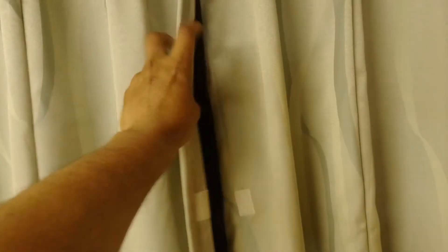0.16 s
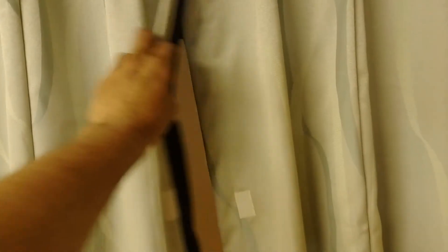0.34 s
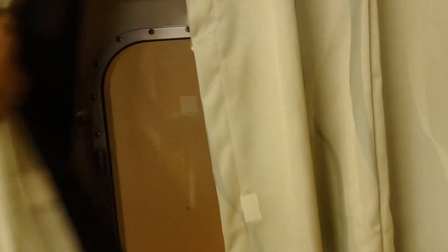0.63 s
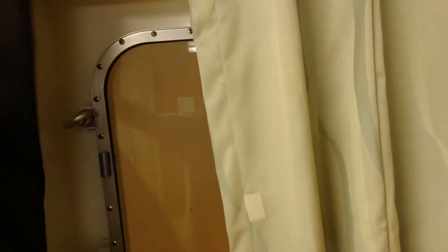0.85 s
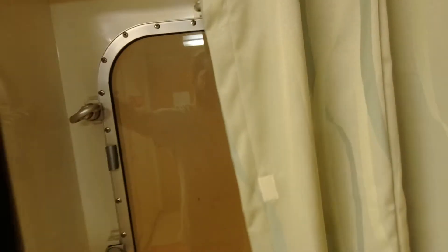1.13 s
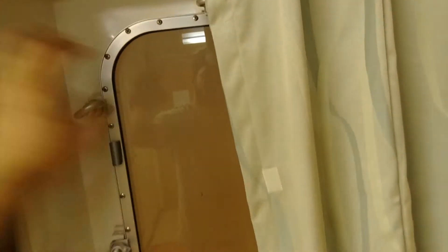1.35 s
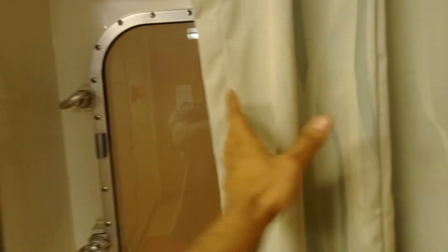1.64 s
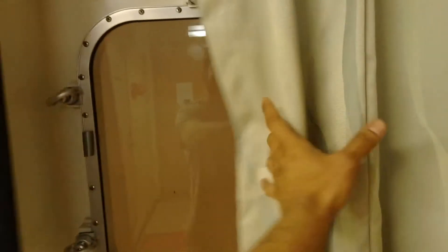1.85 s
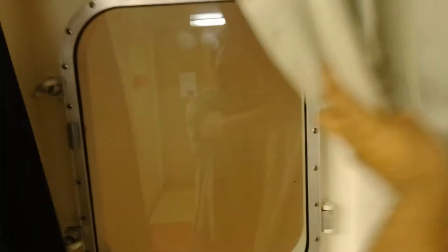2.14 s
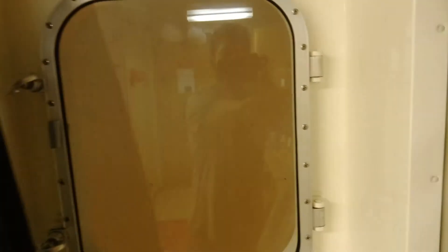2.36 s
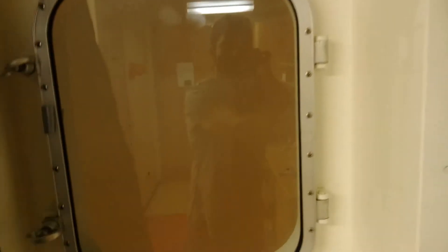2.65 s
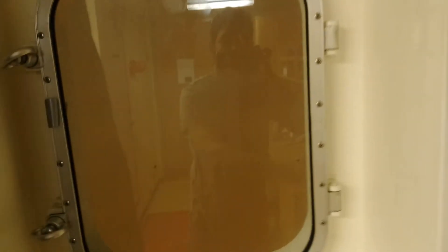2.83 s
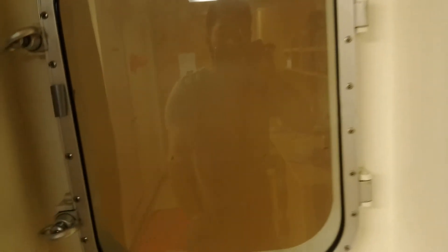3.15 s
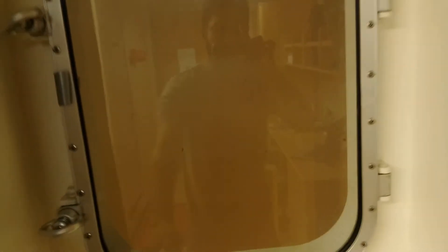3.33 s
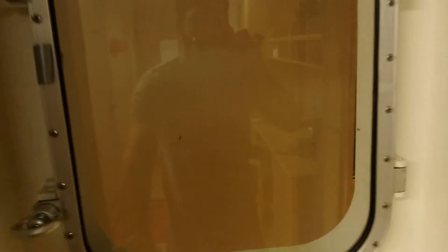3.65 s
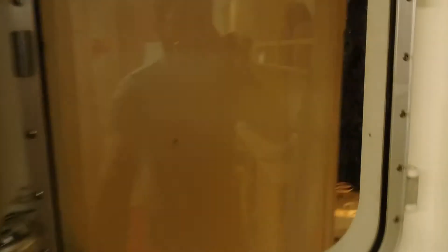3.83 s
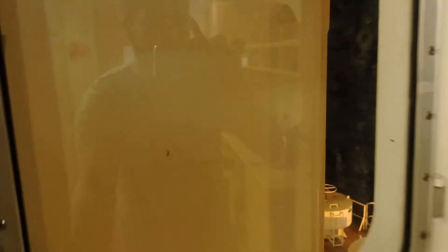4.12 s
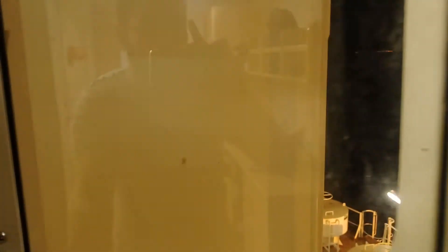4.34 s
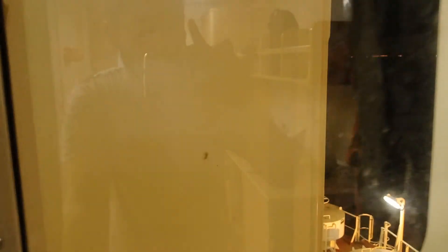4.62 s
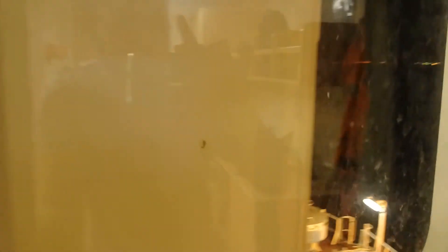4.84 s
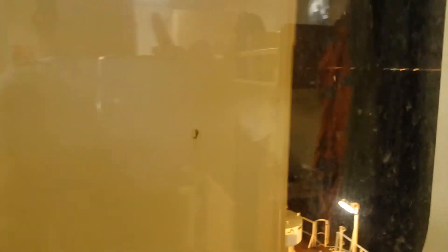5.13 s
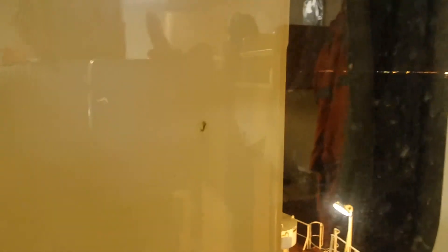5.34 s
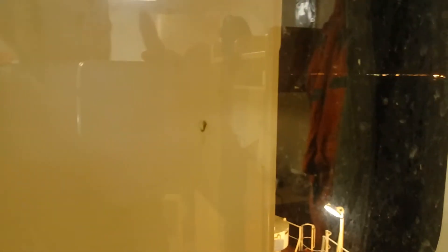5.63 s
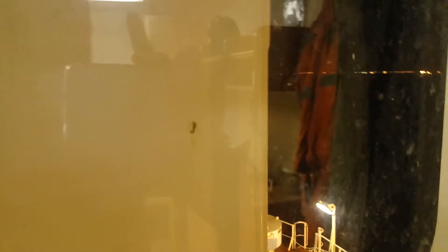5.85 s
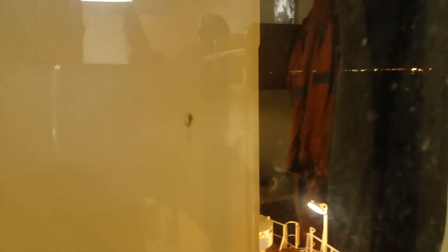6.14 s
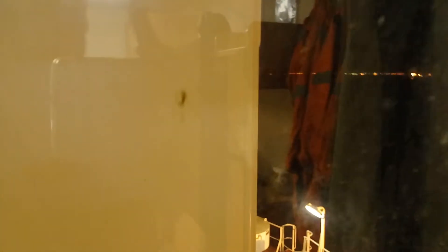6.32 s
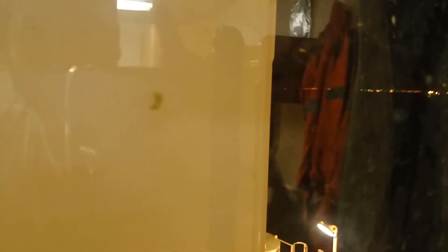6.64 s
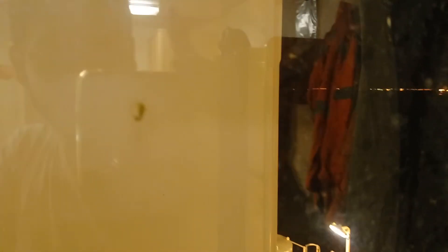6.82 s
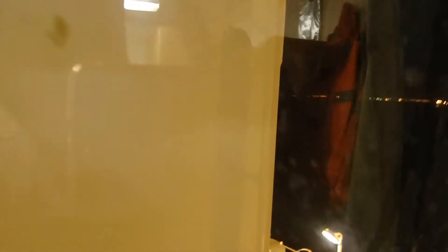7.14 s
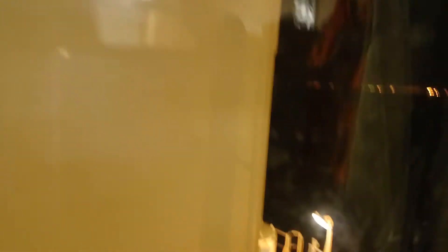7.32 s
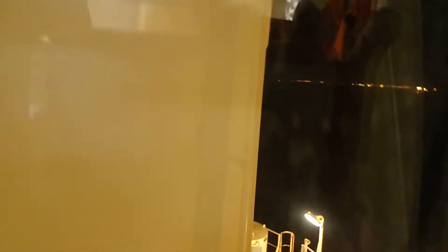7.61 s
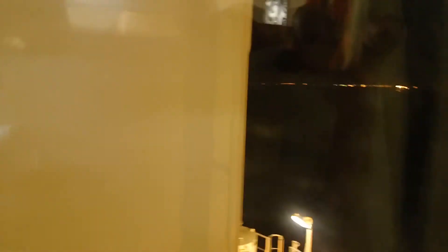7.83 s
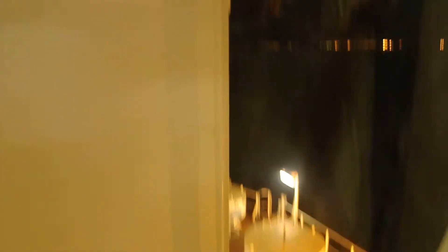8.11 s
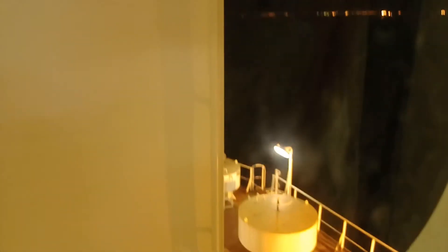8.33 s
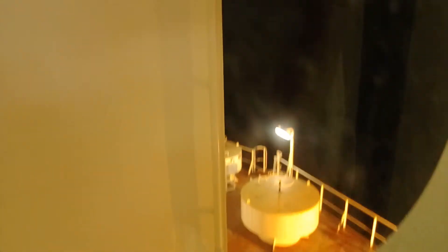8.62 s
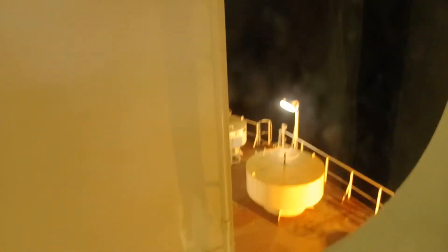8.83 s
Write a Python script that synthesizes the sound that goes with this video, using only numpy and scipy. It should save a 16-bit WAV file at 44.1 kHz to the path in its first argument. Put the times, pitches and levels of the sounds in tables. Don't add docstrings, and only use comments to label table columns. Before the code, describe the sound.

Inside a small ship cabin, engines drone low behind the walls. A curtain is swept aside with a short swish and snap, then a second, brighter and more rattly. A hard click with a dull thud follows. The hum and a duct whistle swell as the handheld microphone nears the porthole, with clothing rustles, a brief sole scuff and dry crackles close by.

```python
import sys
import numpy as np
from scipy import signal
from scipy.fft import rfft, irfft
from scipy.io import wavfile
from scipy.ndimage import uniform_filter1d

SR = 44100
rng = np.random.default_rng(int(sys.argv[2]) if len(sys.argv) > 2 else 0)


def decibels_to_gain(level_db):
    exponent = np.asarray(level_db, float) / 20
    return 10 ** exponent


def inscribe(sig):
    pcm = np.round(np.clip(np.atleast_2d(sig).T, -1, 1) * 32767)
    wavfile.write(sys.argv[1], SR, pcm.astype(np.int16))


N = 395577

# t/s, gain/dB
APPROACH = [(0, -2), (.5, 0.6827), (2.6, 0.5), (3.6, 0), (4.35, 4.5), (4.75, 3.5), (5.5, 5.5), (6.7, 7),
            (7.5, 9), (8.97, 9.5)]


def evened(x):
    return x / np.sqrt(np.mean(x ** 2) + 1e-20)


def read(points, hz):
    f, value = np.transpose(points)
    return np.interp(np.log(hz + 1), np.log(f + 1), value)


def placed(sounds):
    mix = np.zeros((2, N))
    for s, sound in sounds:
        part = mix[:, round(s * SR):][:, :sound.shape[1]]
        part += sound[:, :part.shape[1]]
    return mix


def sides(pan_db):
    return decibels_to_gain(np.array([pan_db / 2, -pan_db / 2]))


def per_band(shape_db, hz, lo, hi):
    return -10 * np.log10(np.sum(decibels_to_gain(2 * shape_db) * (hz > lo) * (hz < hi)) / len(hz))


def patches(shape, size):
    field = rng.standard_normal(shape[::-1]).T
    return evened(uniform_filter1d(uniform_filter1d(field, size[0], 0), size[1], 1))


def partner(a, b, same):
    return same * a + np.sqrt(1 - same ** 2) * b


def arch(t, middle_s, length_s):
    return np.maximum(1 - (2 * (t - middle_s) / length_s) ** 2, 0)


def resonance(hz, centre_hz, width_hz):
    return 1 / (1 + (2 * (hz - centre_hz) / width_hz) ** 2)


def swells(t, rows, rest_db):
    power = decibels_to_gain(2 * rest_db) + 0 * t
    for middle_s, length_s, db in rows:
        power = power + decibels_to_gain(2 * db) * arch(t, middle_s, length_s) ** 2
    return 10 * np.log10(power)


def fan_tones_db(hz, t):
    # f/Hz, width/Hz, middle t/s, length/s, level above drone/dB
    tones = [(1740.2, 45.36, 4.8022, 1.243, 10), (2208.5, 54, 5.2226, .7, 9.5), (3108, 50, 4.5, 1.2, 11.5),
             (2084.2, 41.15, 6.769, 2.148, 8), (1568.9, 36, 6.04, 2.5, 8.5),
             (1695.1, 35.75, 6.744, 2.164, 8.5), (1765, 51, 7.447, 1.3, 5.5),
             (2017.1, 60, 7.8416, 1.019, 9), (1104.6, 43.97, 7.0287, 2.958, 9.5),
             (3444.3, 90, 7.5, 0.87, 7.5), (3387.5, 110, 7.9186, .5, 8), (3469.3, 90, 8.15, 0.63, 8),
             (2955.8, 350, 8, 1.5, -4.5), (1232, 397, 1.559, 0.117, -7.5),
             (1225.3, 247.7, 0.0905, 0.4002, -9), (3256, 60.7, 6.96, 0.743, 4), (2593.8, 50, 8.3, 1.8, 6.5),
             (962.3, 56, 8.5, 0.87, 5), (1419, 651, 1.7781, 0.4925, 6)]
    flutter = patches((2 * len(tones), len(t)), size=(1, 5)).reshape(len(tones), 2, -1)
    total_db = 0
    for (f, width_hz, middle_s, length_s, db), (on, waver) in zip(tones, flutter):
        strength = np.clip(1 + 0.24 * on, 0, 1.5) * arch(t, middle_s, length_s)
        total_db = total_db + db * strength * resonance(hz[:, None], f * (1 + 0.0063 * waver), width_hz)
    return total_db


def panels_db(hz, t):
    # f/Hz, width/Hz, level above drone far from pane/dB, near it/dB
    panels = [(30.98, 7.5, -5.5, -6.5), (59.91, 10.399, 16, 3.5), (91.79, 6.8, 4, -0.5),
              (125.78, 10, -12.5, 7.5), (145.51, 6.8, -12, -6.5), (164.91, 24.67, 6.5, 10.5),
              (199.3, 9.4, 0.5, 9), (226.84, 50.09, 9, 0), (296.44, 14.315, 0.5, 14),
              (332.2, 90.12, 6.5, -11), (450.57, 9.8, 3, 8.5), (524.36, 18.007, 2.5, 7.5),
              (592.85, 96, -4, 4), (1083.5, 30, 3.5, 4), (1220.9, 21, 1, 9), (1744.3, 23, 7.5, 8),
              (2070.8, 120, 3.5, 4.5), (2426.9, 120, 6, 1), (3140, 29, 3.5, -3.5), (3469.7, 56, 5.5, 8)]
    # t/s, nearness to pane/0-1
    nearness = [(0, 0.02), (3.4, 0.18), (4.6, 0.48), (6.8, 0.99), (7.6, 0.92), (8.97, 0.78)]
    near = np.interp(t, *np.transpose(nearness))
    sway = 1 + .011 * patches((len(panels), len(t)), size=(1, 25))
    total_db = 0
    for (f, width_hz, far_db, near_db), k in zip(panels, sway):
        level_db = far_db + (near_db - far_db) * near
        total_db = total_db + level_db * resonance(hz[:, None], f * k, width_hz)
    return total_db


def machinery():
    # f/Hz, density/dB
    drone = [(12, -51), (20, -10), (107, 1.5), (163, -1.5), (187, -7), (248, -19), (337, -23.5), (446, -25),
             (624, -27.5), (718, -27.5), (923, -31.5), (1760, -32), (4420, -54.5), (10500, -57),
             (16000, -59.5)]
    registers = [
        (-45, 0.9242),
        (-50.5, 1.1045),
        (-55.5, 0.81272),
    ]
    # f/Hz, width/Hz
    duct = (743.65, 75.63)
    # middle t/s, length/s, top level/dB
    whistles = [
        (0.68, 0.96, -47.5),
        (3.4, 1.834, -45),
        (5.7, 2.5, -42),
        (8.49, 1.2443, -30.5),
    ]
    # f/Hz, left-right likeness
    likeness = [(60, 0.9864), (200, 0.9695), (300, 0.8107), (700, 0.8448), (1200, 0.5943), (2500, 0.4142),
                (5000, 0.14), (15000, 0.11)]
    hz, t, (a, b) = signal.stft(rng.standard_normal((N, 2)).T, SR, nperseg=4096, noverlap=3072)
    shape = read(drone, hz)
    approach_db = np.interp(t, *np.transpose(APPROACH))
    hull, wall, fan = (db + share * approach_db for db, share in registers)
    hiss = -52.5 + 0 * t
    lift = np.array([hull + per_band(shape, hz, 40, 140), wall + per_band(shape, hz, 250, 680),
                     fan + per_band(shape, hz, 894.4, 3400), hiss + per_band(shape, hz, 900, 3000) - 1.5])
    register = np.interp(np.log(hz + 1), np.log([150, 400, 1100, 3000, 4500]), [0, 1, 2, 2, 3])
    weights = np.maximum(1 - abs(register[:, None] - np.arange(4)), 0)
    gain_db = shape[:, None] + panels_db(hz, t) + weights @ lift + 1.5 * patches(a.shape, size=(5, 8))
    gain = decibels_to_gain(gain_db + fan_tones_db(hz, t))
    whistle = evened(resonance(hz, *duct))
    gain = np.hypot(gain, whistle[:, None] * decibels_to_gain(swells(t, whistles, rest_db=-56.5) - 12.0))
    z = np.array([a, partner(a, b, read(likeness, hz)[:, None])]) * gain
    return decibels_to_gain(0.5) * signal.istft(z, SR, nperseg=4096, noverlap=3072)[1][:, :N]


def hum():
    drive = [(0.25, 0.3939, -40), (0.84, 0.3424, -38.5), (1.38, 0.3249, -33), (1.652, 0.2475, -35),
             (2.345, 0.2243, -37), (2.1, 0.297, -44.5), (2.753, 0.273, -44.5), (3.071, 0.1329, -37),
             (3.45, 0.6018, -44), (4.031, 0.5433, -32.5), (4.196, 0.043, -26), (4.37, 0.09024, -32),
             (4.573, 0.3566, -31.5), (4.849, 0.13954, -29), (5.008, 0.1349, -31), (5.144, 0.10547, -31),
             (5.376, 0.20207, -23.5), (5.538, 0.1382, -29), (5.675, 0.157, -30), (5.833, 0.1509, -23),
             (6.171, 0.5165, -26.5), (6.421, 0.1817, -26.5), (6.619, 0.1096, -36.5), (6.912, 0.43, -26.5),
             (7.149, 0.1154, -27), (7.244, 0.139, -29.5), (7.448, 0.31995, -25.5), (7.784, 0.4235, -24.5),
             (8.125, 0.4818, -24.5), (8.391, 0.2004, -27), (8.579, 0.1641, -28.5), (8.761, 0.19905, -22),
             (8.96, 0.071, -25)]
    centre_hz, wander_hz, rest_db = 160.45, 2.1447, -52.5
    t = np.arange(N) / SR
    drift = evened(uniform_filter1d(uniform_filter1d(rng.standard_normal(N), size=5000), size=5000))
    phase = 2 * np.pi * np.cumsum(centre_hz + wander_hz * drift) / SR
    level_db = swells(t, drive, rest_db + np.interp(t, *np.transpose(APPROACH)))
    return np.sqrt(2) * decibels_to_gain(level_db) * np.sin(phase) * np.ones((2, 1))


def knock(s, db, hz, t60_s):
    t = np.arange(SR // 2) / SR
    noise = rng.standard_normal((2, len(t)))
    band = signal.butter(2, [hz * 0.6573, hz * 1.3226], "band", fs=SR)
    body = signal.lfilter(*band, noise + 0.383 * noise[::-1])
    return s, evened(body) * decibels_to_gain(db - 60 * t / t60_s) * np.minimum(t / 0.006837, 1)


def knocks():
    # t/s, peak/dB, centre f/Hz, t60/s
    rows = [
        (2.38, -36, 349, 0.429),
        (4.189, -33.5, 442.1, 0.5847),
        (4.2, -36, 674.5, 0.4773),
        (4.19, -37.5, 1082.5, 0.2636),
        (4.269, -26, 107.94, 0.2178),
        (4.281, -36, 322, 0.4652),
        (7.33, -34, 355.2, 0.2426),
        (4.2, -34, 233.4, 0.3297),
        (7.335, -33, 196.4, .15),
    ]
    return placed(knock(*row) for row in rows)


def rub(rows, colour, centre_hz, split_hz, slips_per_s, grain_db, same, pan_db, patchy_db, flutter_db=0):
    s, bright_db, dull_db, peak_hz = np.transpose(rows)
    n = round((s[-1] - s[0]) * SR)
    draw = rng.random((n, 2))
    slips = decibels_to_gain(-grain_db * np.log(draw[:, 0] + 0.024)) * (draw[:, 1] < slips_per_s / SR)
    decay_s = 0.00031
    grit = evened(1 + signal.lfilter([1], [1, -np.exp(-1 / (decay_s * SR))], slips))
    a, b = rng.standard_normal((n, 2)).T
    grains = grit * np.array([a, partner(a, b, same)])
    hz, t, z = signal.stft(grains, SR, nperseg=256, noverlap=192)
    t = t + s[0]
    shape = read(colour, hz)
    high = np.clip((hz / split_hz - .8) / 0.905, 0, 1)[:, None]
    slid_hz = hz[:, None] * centre_hz / np.interp(t, s, peak_hz)
    upper = read(colour, slid_hz) + per_band(shape, hz, split_hz, SR)
    lower = shape[:, None] + per_band(shape, hz, 0, split_hz) + np.interp(t, s, dull_db)
    gain_db = high * upper + (1 - high) * lower + np.interp(t, s, bright_db)
    gain_db = gain_db + patchy_db * patches(z[0].shape, size=(8, 40))
    gain_db = gain_db + flutter_db * patches(z[0].shape, size=(40, 6))
    out = signal.istft(z * decibels_to_gain(gain_db), SR, nperseg=256, noverlap=192)[1] * sides(np.array([pan_db]))
    return s[0], out * signal.windows.tukey(out.shape[1], 0.009215 / (s[-1] - s[0]))


def clothes():
    moves = [(.03, -65.5, -0.01, -11.5), (.1, -59.5, 0.1486, -12.5), (.43, -59.5, 0.2867, -8.5),
             (.53, -56, 0.2144, -7), (1.2, -57, 0.1157, -6), (1.38, -54.5, 0.1862, -9.5),
             (1.46, -56, 0.2112, -4), (1.66, -59, 0.2993, -14.5), (1.9, -63, 0.0683, 0),
             (2.13, -54, 0.2486, -9.5), (2.72, -48.5, 0.2709, -6), (2.95, -63.5, 0.5232, -15.5),
             (3.18, -57.5, -0.02, -2), (3.33, -58, 0.1068, -3), (3.57, -55, 0.1318, -9.5),
             (3.8, -66, 0.1308, -2), (3.96, -63, 0.1206, -17.5), (4.17, -52.5, 0.0146, -4),
             (4.28, -63, 0.5, -13), (4.46, -68.5, 0.0844, -7), (4.6, -64, 0.2583, -15.5),
             (4.8, -71, 0.3516, -10.5), (5.0, -68.5, 0.1137, -4.5), (5.14, -66, 0.1139, -3),
             (5.28, -59, 0.0227, 0), (5.77, -73, 0.0751, -10.5), (5.915, -49.5, 0.0276, -11),
             (5.94, -48.5, 0.023, -5.5), (5.97, -53.5, 0.03, -8), (6.15, -65.5, 0.5, -13),
             (6.37, -56, 0.0736, -9.5), (6.57, -60, 0.1014, -4), (6.66, -54, 0.1073, -7),
             (6.905, -64, 1.0426, -19), (7.0, -60.5, 0.393, -22.5), (7.1, -58, 0.1514, -6.5),
             (7.2, -51.5, 0.1487, 0.5), (7.28, -50, 0.1128, -14.5), (7.36, -43, 0.007, -8),
             (7.4, -43.5, 0.0264, -19), (7.53, -50, 0.0565, -14), (7.65, -49, 0.0622, -13.5),
             (7.76, -52, 0.1055, -16), (7.88, -50.5, 0.0488, -12.5), (7.97, -59.5, 0.1758, -16.5),
             (8.04, -66, 0.2327, -18.5)]
    # f/Hz, density/dB
    rustle = [(1500, -24.5), (2500, -7.5), (3300, -6.5), (4600, -12.5), (6000, -12.5), (7500, -13),
              (8700, -8), (10000, -6), (11000, -3), (12200, -13.5), (16000, -22.5)]
    rise_share = 0.7868
    s = np.arange(0, N / SR, .005)
    top_s, db, fall_s, dull_db = np.transpose(moves)[:, :, None]
    drop = np.maximum((s - top_s) / fall_s, (top_s - s) / (rise_share * fall_s))
    power = decibels_to_gain(2 * (db - 10 * drop)) + 1e-30
    bright = power.sum(0)
    dull = (power * decibels_to_gain(2 * dull_db)).sum(0) / bright
    rows = np.transpose([s, 10 * np.log10(bright), 10 * np.log10(dull), 10300 + 0 * s])
    return placed([rub(rows, rustle, centre_hz=10500, split_hz=6000, slips_per_s=400, grain_db=1.0,
                       same=.3, pan_db=-.3, patchy_db=1.7)])


def scuff():
    # hold/s, bright level/dB, dull re bright/dB
    hold_s, db, dull_db = (0.06659, -48, 5.413)
    # f/Hz, density/dB
    sole = [(820, -46), (1400, -21.5), (1610, 2), (1790, -1), (1960, -4.5), (2280, -15), (3070, -10),
            (3360, -14), (4380, -11.5), (4570, -21.5), (5890, -19.5), (6520, -22), (9320, -25.5),
            (11900, -19.5), (16000, -40.5)]
    start_s, set_in_db_per_s, let_go_db_per_s = 6.655, 3000, 260
    s = np.arange(-.04, .18, .005)
    drop_db = np.maximum(-set_in_db_per_s * s, let_go_db_per_s * (s - hold_s))
    level_db = db - np.maximum(drop_db, 0)
    rows = np.transpose([start_s + s, level_db, dull_db + 0 * s, 10500 + 0 * s])
    return placed([rub(rows, sole, centre_hz=10500, split_hz=4300, slips_per_s=300, grain_db=1.5,
                       same=.4, pan_db=.3, patchy_db=1.5)])


def crackle(s, db, hz, ms):
    t = np.arange(2400) / (SR * ms / 1000)
    burst = rng.standard_normal((2, 2400)) * np.exp(-t) * (1 - np.exp(-t / 0.27)) ** 2
    spread = .13
    band = signal.butter(3, [hz * (1 - spread), hz * (1 + spread)], "band", fs=SR)
    ring = signal.lfilter(*band, burst + 0.13 * burst[::-1])
    return s, decibels_to_gain(db + 1.5) * ring / abs(ring).max()


def crackles():
    # t/s, peak/dB, ring f/Hz, length/ms
    rows = [(0.2558, -46, 10810, 8.73), (.2566, -47, 8210, 11.67), (4.4263, -46, 11220, 5.453),
            (4.9691, -49, 11020, 8.93), (5.111, -47.5, 11230, 8.08), (5.231, -48.5, 11350, 10),
            (5.372, -54.5, 11000, 8), (5.633, -46, 11400, 9.14), (6.8372, -52.5, 10790, 6.05),
            (6.8969, -45, 11330, 11.72), (6.958, -50, 11210, 12.03), (6.985, -41.5, 11510, 11.95),
            (6.998, -40.5, 10760, 9.7), (7.315, -27.5, 11020, 2.393), (7.382, -21.5, 10380, 2.9),
            (7.401, -31.5, 10810, 3.87), (7.4589, -40, 10960, 3.043), (7.5162, -47.5, 10190, 12.09),
            (7.546, -43.5, 11410, 5.97), (7.5885, -47.5, 11600, 3.287), (7.6223, -39, 11000, 3.96),
            (7.645, -43.5, 10800, 8.08), (7.6733, -43.5, 10600, 5.045), (7.7281, -34.5, 11430, 3.43),
            (7.7686, -44.5, 11000, 5.02), (7.787, -42.5, 11600, 4.39), (7.842, -45.5, 11500, 13.75),
            (7.895, -47, 12000, 5.9)]
    return placed(crackle(*row) for row in rows)


def squeak(s, seconds, start_hz, end_hz, db, shake_hz):
    n = round(seconds * SR)
    shake = evened(uniform_filter1d(rng.standard_normal((n, 2)), size=90, axis=0)).T
    phase = 2 * np.pi * np.cumsum(np.linspace(start_hz, end_hz, n) + shake_hz * shake[0]) / SR
    return s, decibels_to_gain(db + 2.69 * shake[1]) * np.sin(phase) * signal.windows.tukey(n, .5) * np.ones((2, 1))


def squeaks():
    # t/s, length/s, start f/Hz, end f/Hz, level/dB, unsteadiness/Hz
    rows = [
        (1.639, 0.0403, 8770, 8346, -53.5, 70),
        (1.63, 0.07507, 10300, 10230, -51, 250.2),
        (1.735, 0.038, 9700, 10190, -55.5, 70),
        (1.762, 0.02973, 10120, 9549, -54.5, 70),
        (2.9, 0.38, 8920, 8597, -59, 260),
        (4.113, 0.0748, 11300, 12690, -59.5, 90),
        (6.688, 0.04842, 3200, 3000, -46, 90.04),
    ]
    return placed(squeak(*row) for row in rows)


def click():
    # f/Hz, density/dB
    colour = [(300, -34.5), (900, -10.5), (2250, -3.5), (3600, -32), (4700, -14), (6800, -12), (10300, -6),
              (13300, -13), (16000, -26.5)]
    start_s, db = 4.1896, -23
    t = np.arange(SR // 4) / SR
    bounce = 0.1135 * np.exp(-abs(t - .011) / 0.000997)
    rattle = np.exp(-t / 0.005383) + bounce + 0.1843 * np.exp(-t / 0.04757)
    noise = rng.standard_normal((2, len(t)))
    hz = np.fft.rfftfreq(len(t), 1 / SR)
    spectrum = rfft(noise + 5.965 * noise[::-1]) * decibels_to_gain(read(colour, hz))
    return start_s, decibels_to_gain(db) * evened(irfft(spectrum, len(t))) * rattle


def tick(s, db, hz, knock_db, ms):
    t = np.arange(1200) / (SR * ms / 1000)
    burst = rng.standard_normal((2, 1200)) * np.exp(-t) * np.minimum(t / 0.054, 1)
    burst = burst + 0.095 * burst[::-1]
    ring = signal.lfilter(*signal.butter(2, [hz * .85, hz * 1.16], "band", fs=SR), burst)
    top = signal.lfilter(*signal.butter(2, 9000, "high", fs=SR), burst)
    dull = signal.lfilter(*signal.butter(2, [1700, 4800], "band", fs=SR), burst)
    bright = evened(ring) + 0.2792 * evened(top)
    return s, decibels_to_gain(db + 3) * (bright / abs(bright).max() + decibels_to_gain(knock_db) * dull / abs(dull).max())


def hard_hits():
    # t/s, peak/dB, ring f/Hz, low knock re ring/dB, length/ms
    ticks = [(0.255, -49, 6000, -1.5, 4.76), (0.833, -25, 7800, -3, 1.442),
             (0.8417, -19, 6850, -3.5, 2.483), (2.116, -34.5, 9600, -3, 2.488),
             (2.2251, -29, 6560, 3, 2.718), (2.2871, -26, 6700, -3, 2.277),
             (2.352, -31.5, 7160, -11.5, 1.64), (2.515, -20.5, 9760, -6, 1.3),
             (2.5277, -13, 7130, -7.5, 2.706), (2.6953, -24, 6750, -2, 3.234),
             (2.7042, -28.5, 7600, -0.5, 2.962), (2.3155, -38, 7470, -19, 3),
             (2.3449, -31.5, 7490, -1, 3.09), (2.4493, -29.5, 7390, -14.5, 4.05),
             (2.523, -23.5, 7170, -10, 1.177), (2.553, -26.5, 11000, -15.5, 2.7),
             (2.6955, -29.5, 10500, -9.5, 1.507)]
    rattles = [
        (0.891, -28, 6934, 3, 4.13),
        (2.1993, -39, 7304, 4.5, 4.434),
        (2.294, -31.5, 7393, 4, 4.69),
        (2.371, -25.5, 7524, -18.5, 6.73),
        (2.4004, -16, 6884, -5, 4),
        (2.405, -18, 8500, 0, 3.604),
        (2.4739, -20, 7900, -7, 3.5),
        (2.489, -22, 8104, 1.5, 2.1),
        (2.5345, -17.5, 8110, -14, 1.9),
    ]
    snaps = [
        (1.0889, -19, 7200, -3, 1.2),
        (2.5365, -12.5, 14500, -30, 2.5),
        (2.5372, -12, 7500, -8, 2),
        (2.5155, -24, 13000, -30, 2),
        (4.1925, -19, 11000, -6, 3),
        (4.1995, -23, 9500, -2, 3),
        (4.1897, -16, 12000, -8, 1.8),
    ]
    flicks = [
        (4.4269, -52.5, 8000, 4, 7.91),
        (4.9695, -54.5, 7500, 4.5, 8),
        (5.111, -52, 7495, 3, 7.88),
        (5.231, -52, 8000, 1.5, 9.5),
        (5.633, -51.5, 6998, 4, 8.85),
        (6.51, -48, 7500, 0, 3.553),
        (6.658, -46, 6000, 9.5, 5.2),
        (.701, -37.5, 8250, -4, 2.945),
    ]
    return placed([tick(*row) for row in ticks + rattles + snaps + flicks] + [click()])


def curtains():
    # t/s, swish level by hand speed/dB, rail scrape re swish/dB, fabric pitch/Hz
    pulls = [
        [(.555, -57.5, -12.5, 9000), (.585, -46, -2, 8606), (.69, -45, -0.5, 9024), (.71, -41, 0, 8909),
         (.8, -41, -2.5, 9013), (.845, -42.5, 0.5, 9140), (.862, -42.5, 2.5, 9000)],
        [(.858, -48, -2.5, 9000), (.872, -37, -1.5, 8965), (.93, -38.5, -7.5, 8983), (.97, -35.5, -6, 8859),
         (1.03, -37, -6, 9094), (1.06, -39, -3.5, 9112), (1.115, -48, 0, 9370), (1.14, -61, -3.5, 9400)],
        [(2.17, -56.5, -5, 9000), (2.24, -60, 15, 9000), (2.28, -58.5, -9, 9000), (2.3, -55.5, 1, 8997),
         (2.345, -43, -0.5, 9197), (2.39, -39, 2.5, 9257), (2.4, -46.5, 4, 9000)],
        [(2.395, -36, 4, 9000), (2.43, -34.5, 1.5, 9020), (2.455, -26.5, -4.5, 9077),
         (2.485, -28.5, -3.5, 8766), (2.51, -36, 2, 9233), (2.545, -37.5, -10.5, 14000),
         (2.6, -39.5, -4.5, 13330), (2.68, -52, 0, 11750), (2.78, -56.5, 0.5, 11000)],
    ]
    # f/Hz, density/dB
    swishes = [
        [(590, -12), (1000, -4), (1120, -36), (1220, -11), (1690, -6), (2710, -7), (4000, -8.5), (4700, -14), (5400, -15.5), (6000, -5.5), (6860, 0), (7800, -4), (9490, -1.5), (11800, -11.5), (14200, -14.5), (16000, -18.5)],
        [(350, -44), (600, -12.5), (1550, -15.5), (1730, -10), (2470, -8), (2830, -11.5), (3480, -2), (4300, 0), (5260, -10), (6300, 1), (7410, 4.5), (12200, -3), (14900, -7.5), (16000, -20)],
    ]
    stroke_curtain = (0, 0, 1, 1)
    return placed(rub(rows, swishes[curtain], centre_hz=9368.7, split_hz=3966, slips_per_s=1400,
                      grain_db=-14.0, same=0.2632, pan_db=-0.5, patchy_db=2.0, flutter_db=1.5)
                  for rows, curtain in zip(pulls, stroke_curtain))


def cabin(x):
    # f/Hz, t60/s
    decay = [(300, 0.32), (1000, 0.42), (3000, 0.35555), (8000, 0.1294), (15000, 0.1588)]
    taps = np.zeros((2, SR // 2))
    at = np.arange(200, SR // 2 - 20, 20) + rng.integers(0, 20, (2, (SR // 2 - 201) // 20))
    np.put_along_axis(taps, at, rng.choice([-1., 1.], at.shape), 1)
    hz, t, z = signal.stft(taps, SR, nperseg=256)
    tail = signal.istft(z * decibels_to_gain(-60 * t / read(decay, hz)[:, None]), SR, nperseg=256)[1]
    return signal.fftconvolve(x, tail / np.linalg.norm(tail[0]), axes=1)[:, :N]


def scene():
    steady = machinery() + hum()
    near = knocks() + clothes() + scuff() + squeaks()
    creases, hits, pulls = crackles(), hard_hits(), curtains()
    room = cabin(decibels_to_gain(-8.0) * hits + decibels_to_gain(-14.0) * pulls + decibels_to_gain(-11.0) * creases)
    return steady + near + creases + hits + pulls + room


def top_cut(x):
    return signal.sosfilt(signal.butter(12, 15900, fs=SR, output="sos"), x)


def record(dry):
    # f/Hz, left re right/dB
    tilt = [(60, -4), (200, -3), (380, -2.5), (700, -2), (1290, -5), (2380, -10), (4400, 0), (8120, -5),
            (15000, -9)]
    # f/Hz, left port lead/rad
    port_lead = [(0, 0), (950, .4), (1720, 2.9), (2550, 5), (4900, 12), (16000, 45)]
    margin = 2048
    wide = np.pad(dry, ((0, 0), (margin, margin)), "reflect")
    hz = np.fft.rfftfreq(wide.shape[1], 1 / SR)
    lead_rad = np.interp(hz, *np.transpose(port_lead)) * np.array([[1], [-1]])
    ports = sides(read(tilt, hz)) * np.exp(.5j * lead_rad)
    edge = 1 / np.sqrt(1 + (hz / 15850) ** 600)
    heard = irfft(rfft(wide) * ports * edge, wide.shape[1])[:, margin:-margin]
    return top_cut(heard)


dry = scene()
out = record(dry)
inscribe(out)
```